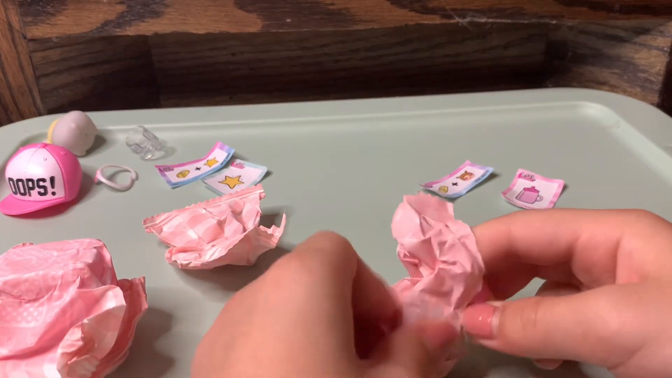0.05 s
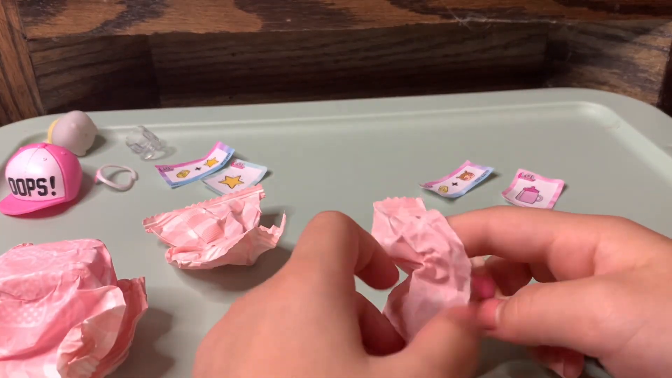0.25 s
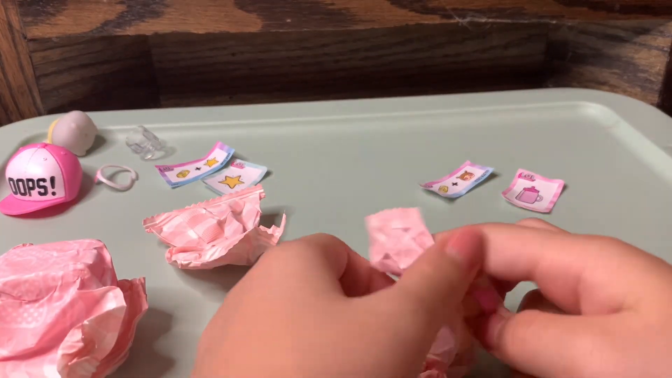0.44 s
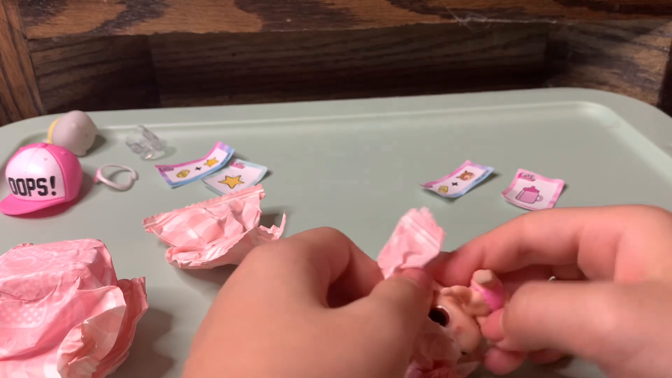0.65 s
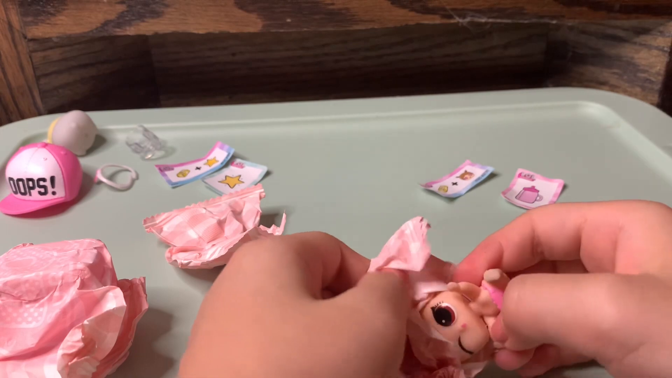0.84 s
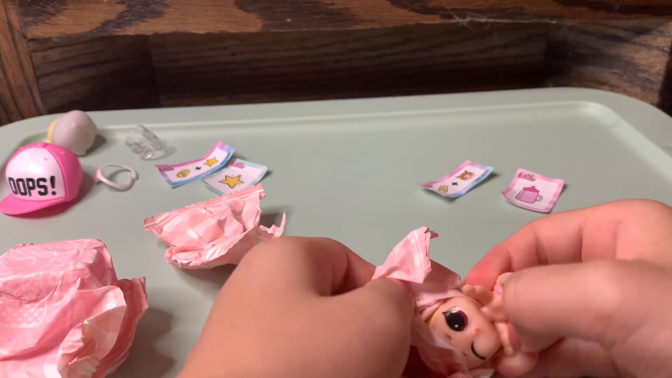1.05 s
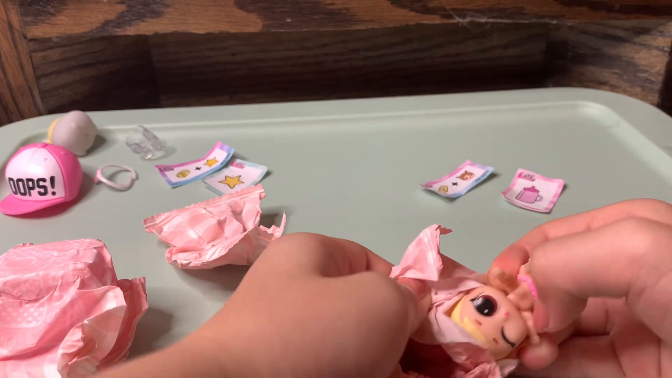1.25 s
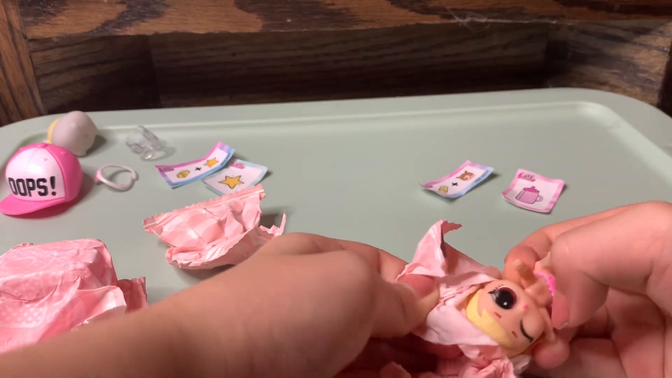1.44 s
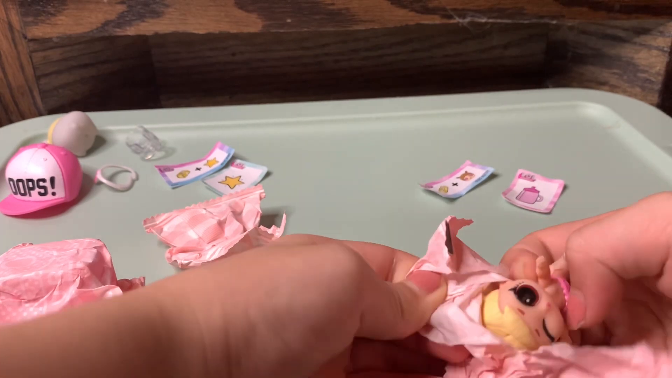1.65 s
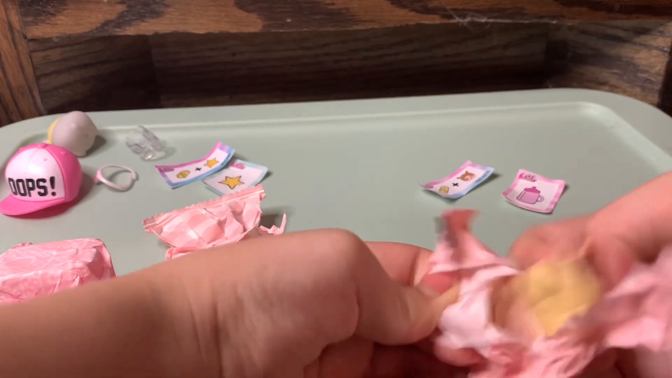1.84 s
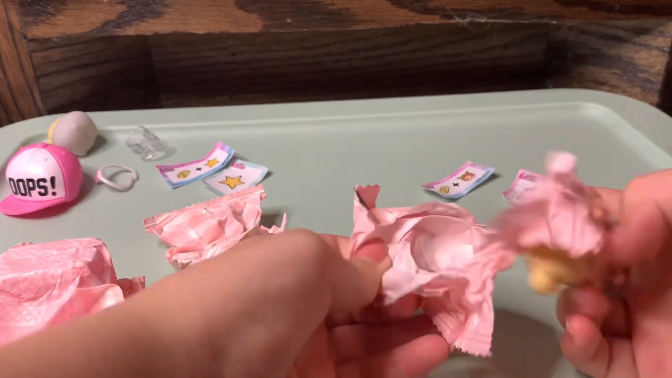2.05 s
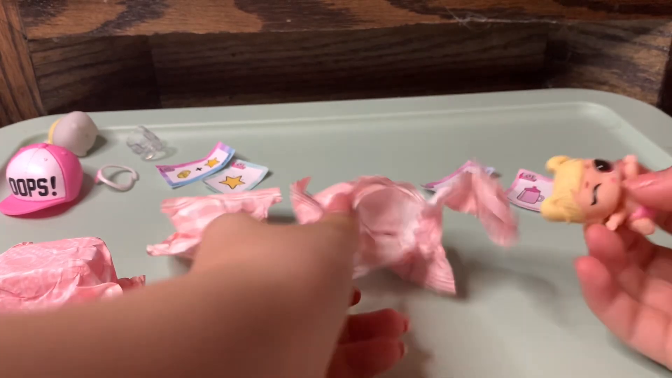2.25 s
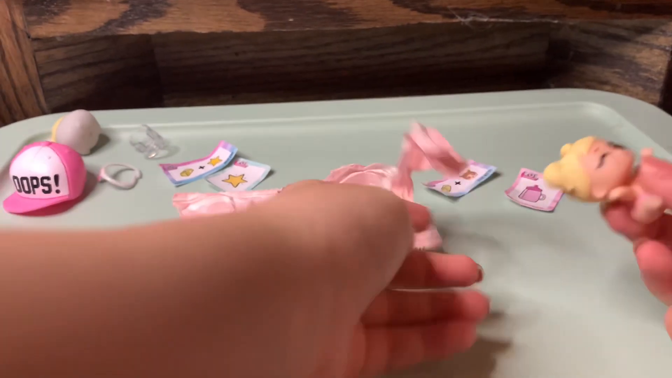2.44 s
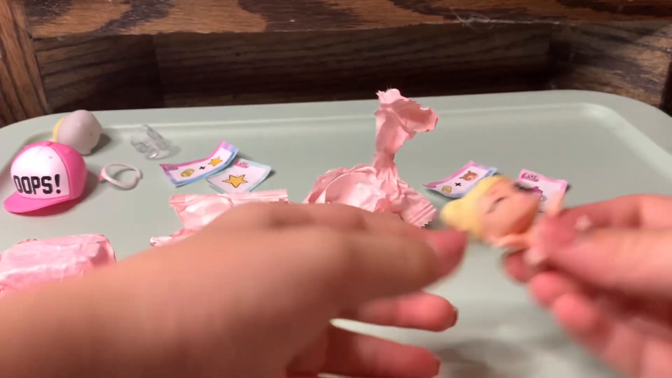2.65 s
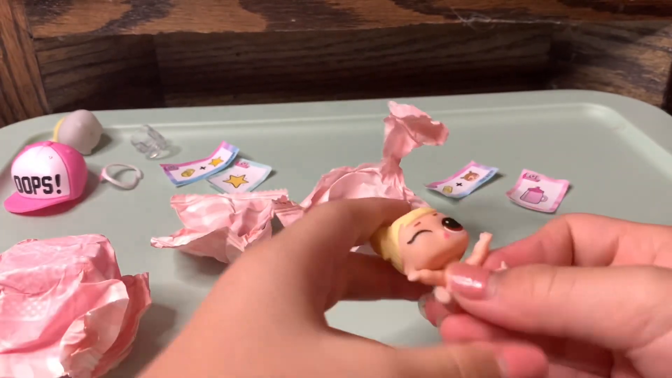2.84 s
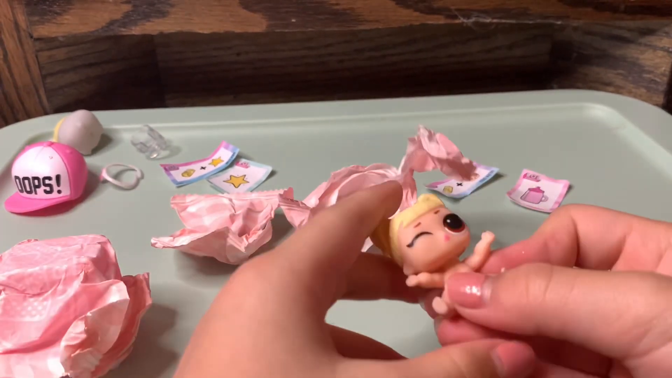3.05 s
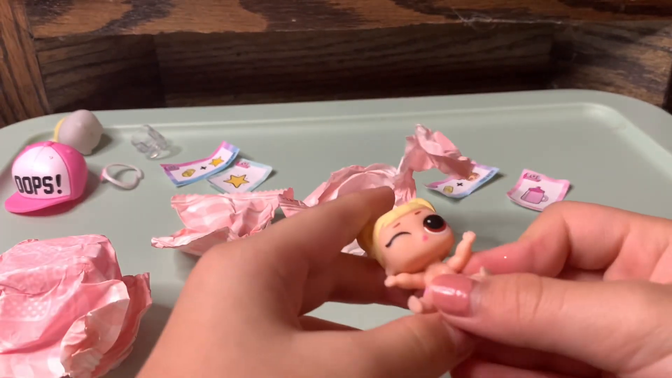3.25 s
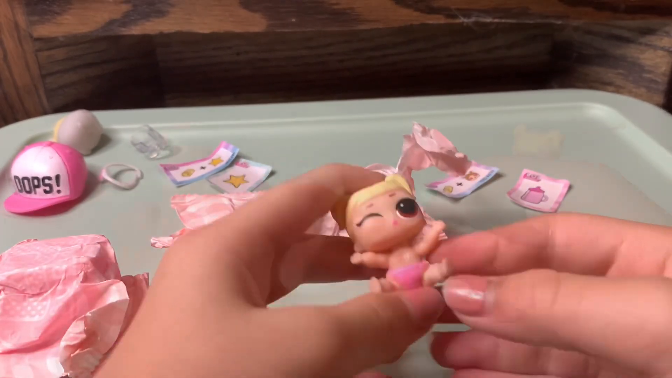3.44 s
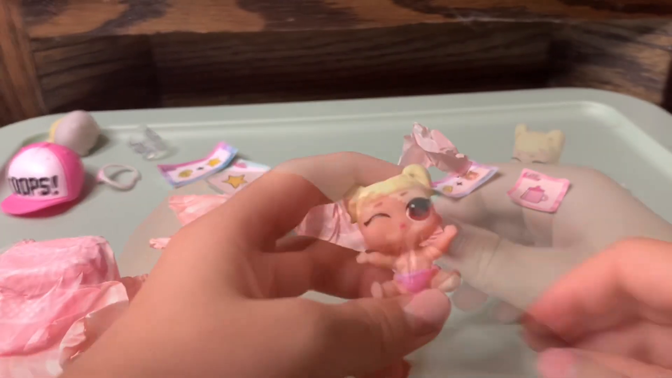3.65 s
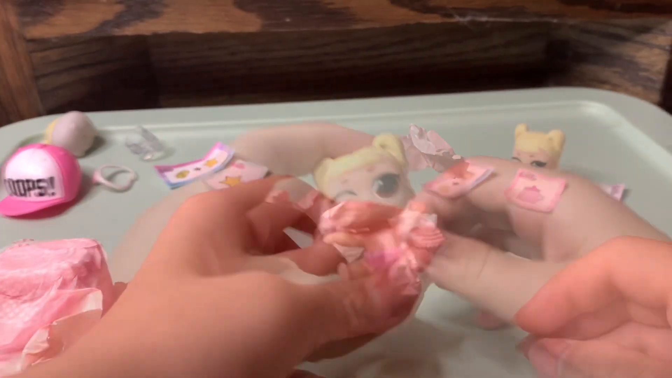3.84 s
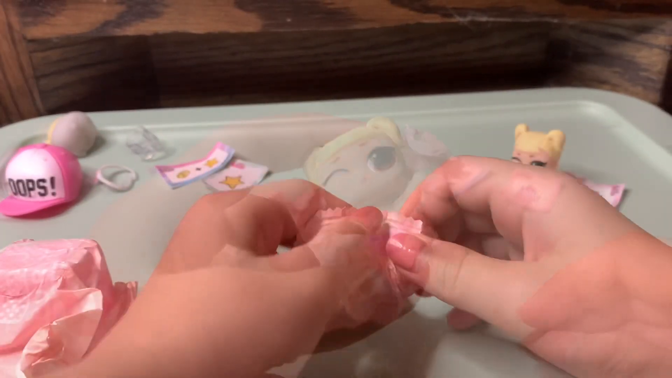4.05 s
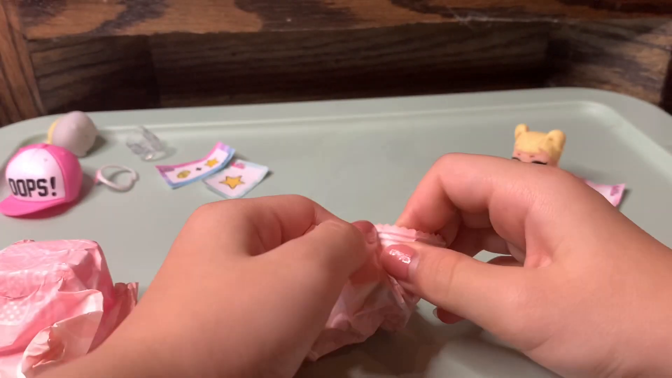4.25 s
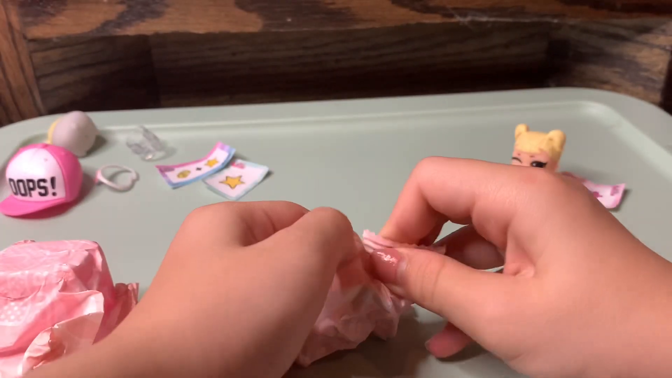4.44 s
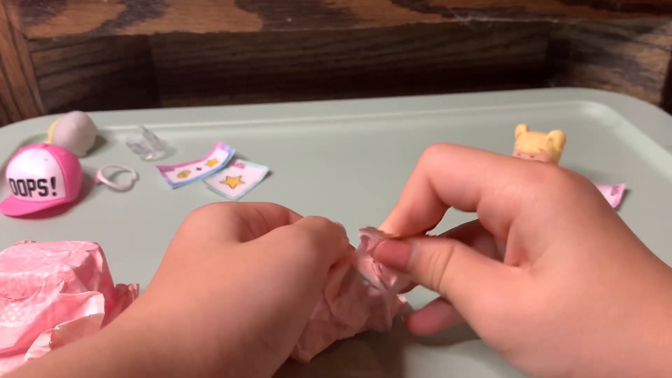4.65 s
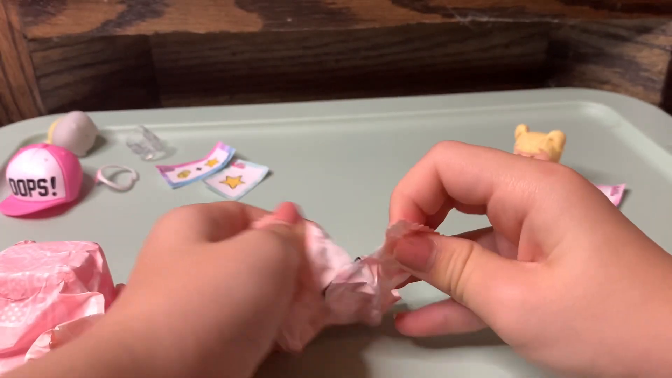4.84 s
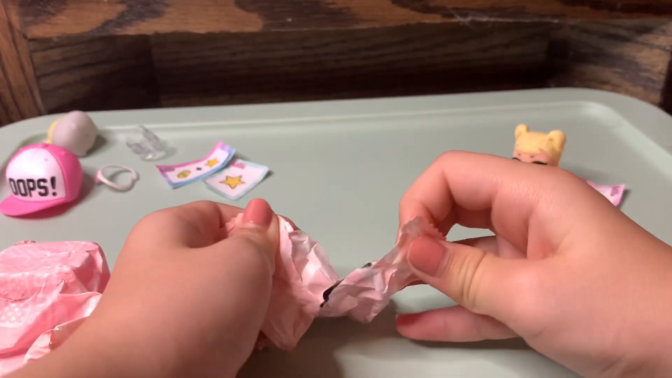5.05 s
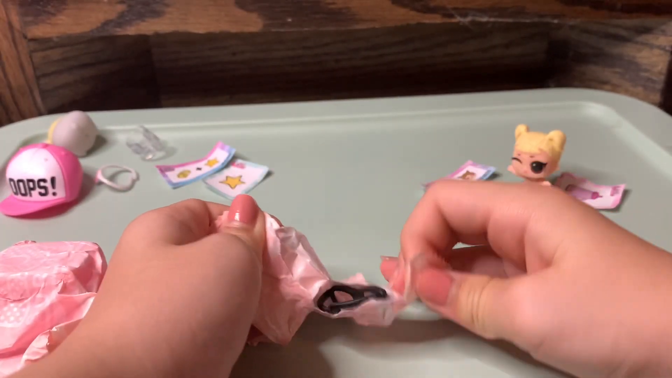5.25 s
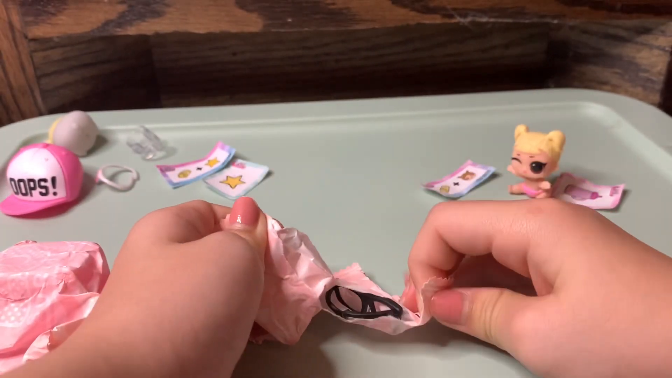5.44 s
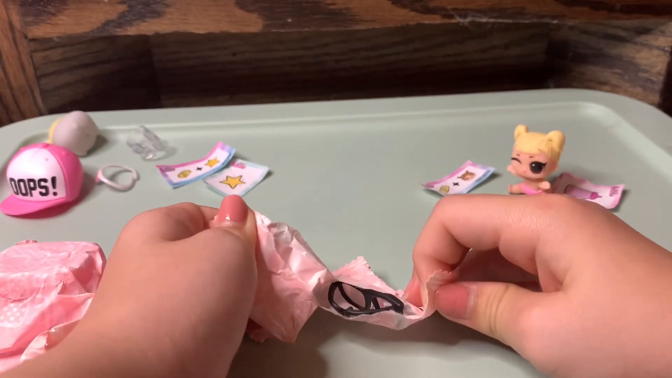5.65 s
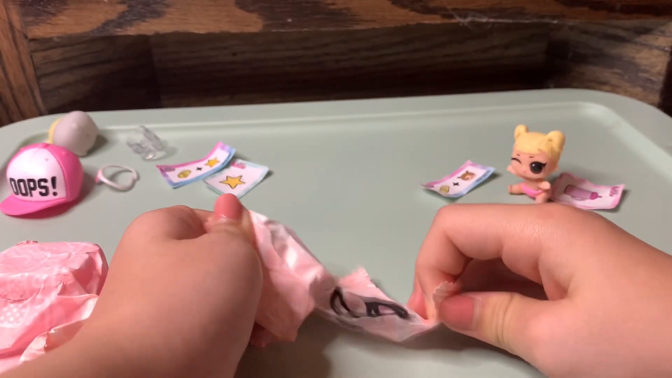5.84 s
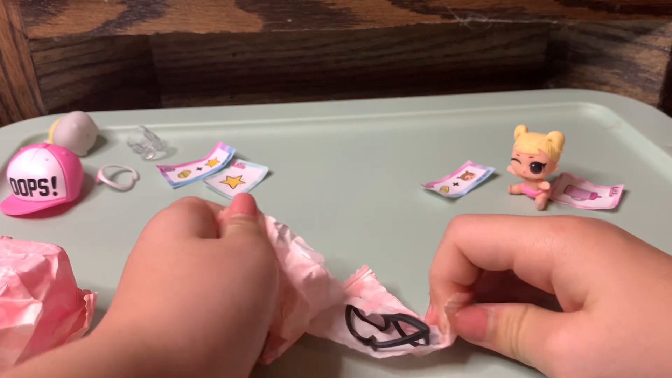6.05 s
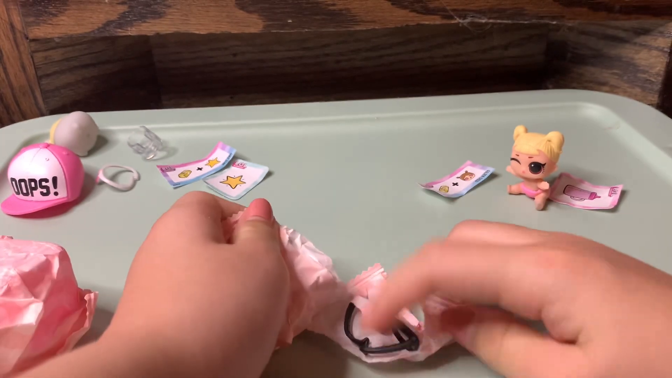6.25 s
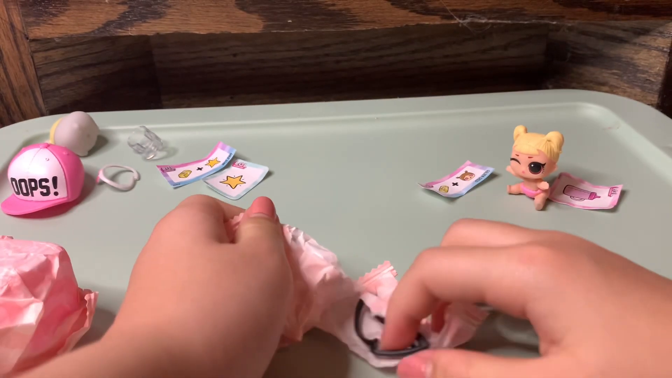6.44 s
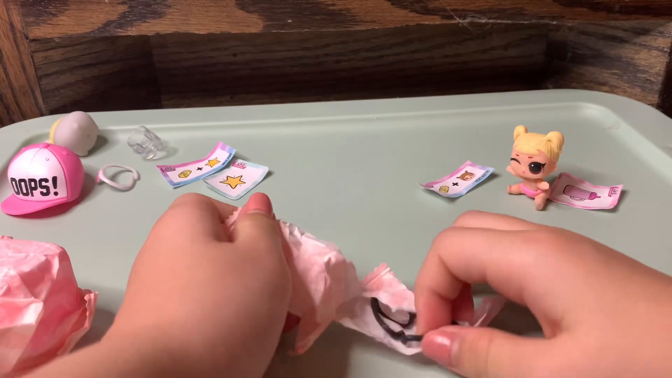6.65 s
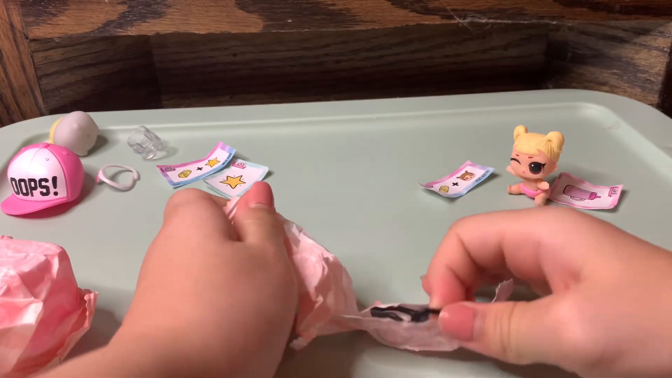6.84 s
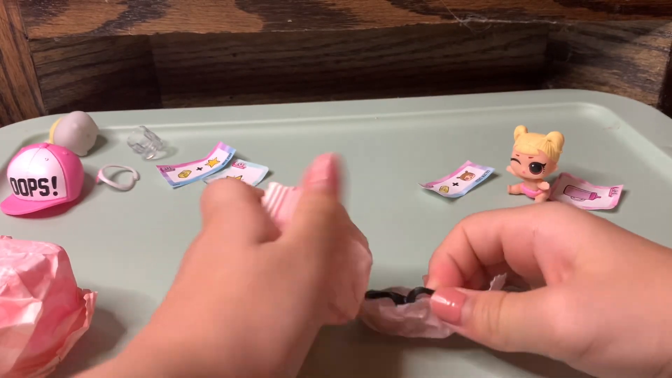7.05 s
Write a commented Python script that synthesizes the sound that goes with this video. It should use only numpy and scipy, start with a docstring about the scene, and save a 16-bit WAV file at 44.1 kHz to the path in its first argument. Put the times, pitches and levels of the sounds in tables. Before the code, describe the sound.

Close to a phone in a quiet room, thin wrapping film crackles and snaps as fingers squeeze it, then tears open. The rustle dies away for about a second before more wrapping is worked, with several short, bright rips. A deep rumble from an arm sliding on the table follows the last rip while the crinkling carries on. Occasional dull knocks on a plastic tray and a low hum lie underneath.

```python
"""Thin wrapping film crackles as hands crumple it and tear it open over a plastic tray, close to a
phone's two microphones in a quiet room. Each crease that buckles is a short snap, coloured by the air
cupped under the hands; squeezes are swells of small snaps and tears are dense runs of them. Fingers
bump, rub and slide, a forearm drags once along the table, and the room hums low behind it all."""
import sys
import numpy as np
from scipy import signal
from scipy.fft import rfft, irfft, next_fast_len
from scipy.io import wavfile
from scipy.ndimage import uniform_filter1d, map_coordinates

SR = 44100
rng = np.random.default_rng(int(sys.argv[2]) if len(sys.argv) > 2 else 0)


def generate_wav(sig):
    """Save sig (samples, or channels by samples) to the path in sys.argv[1] as 16-bit PCM at SR."""
    pcm = np.round(np.clip(np.atleast_2d(sig).T, -1, 1) * 32767).astype(np.int16)
    wavfile.write(sys.argv[1], SR, pcm)


N = 313551

# centres of the four zones of a crease's sound: thud, ring, body, treble (frequency [Hz])
ZONES_HZ = [500, 1500, 3400, 9000]


def amp(db):
    """Gain of a level in dB."""
    return 10 ** (np.asarray(db) / 20)


def along(points, hz):
    """A curve through (Hz, value) points on a log frequency axis."""
    knots, values = np.transpose(points)
    return np.interp(np.log(hz + 1), np.log(knots + 1), values)


def read(rows, t):
    """Each column after the time, at times t."""
    times, *columns = np.transpose(rows)
    return np.array([np.interp(t, times, column) for column in columns])


def wobble(rate, t):
    """A smooth random curve at times t, with rate knots a second."""
    return map_coordinates(rng.standard_normal(int(N * rate / SR) + 4), [t * rate])


def filtered(x, response):
    """x through a complex response, given as a function of frequency."""
    size = next_fast_len(N + 8192)
    return irfft(rfft(x, size) * response(np.fft.rfftfreq(size, 1 / SR)), size)[..., :N]


def ears(pair, alike):
    """Left and right from two unrelated noises, at a given likeness (1 = identical)."""
    turn = np.arccos(np.clip(alike, -1, 1)) / 2
    mid, side = np.cos(turn) * pair[0], np.sin(turn) * pair[1]
    return np.array([mid + side, mid - side])


def rush(spectrum):
    """Steady stereo noise of rms 1, shaped by (Hz, dB) points."""
    # room sound across the two microphones: (frequency [Hz], likeness [0-1])
    likeness = [(200, 0.92), (400, 0.79), (1000, .1), (5500, .2), (7500, 0.75), (15000, 0.96)]
    size = next_fast_len(N)
    hz = np.fft.rfftfreq(size, 1 / SR)
    white = ears(rfft(rng.standard_normal((2, size))), along(likeness, hz))
    noise = irfft(white * amp(along(spectrum, hz)), size)[:, :N]
    return noise / np.sqrt(np.mean(noise ** 2))


def film_colour(times, zones_db, stretch, hz):
    """Spectrum of each crease: the film heard together with its reflection off the tray, a comb of evenly
    spaced peaks."""
    # the open film: (frequency [Hz], level per Hz [dB])
    film = [(100, -8.5), (300, -6.5), (800, -7.5), (1600, -8.5), (2100, 0.5), (3500, 8), (4600, -1.5),
            (6000, -2.5), (7600, 3), (10000, 0), (15000, -6)]
    # peaks of the comb made by the film's reflection off the tray: (frequency [Hz], width [Hz], gain over the
    # open film [ratio])
    modes = [(1620, 220, 3), (3100, 320, 1.2), (4550, 500, 2.2), (6200, 450, 1.1)]
    # lift of each zone, as narrow zones hold more level per Hz: (gain [dB])
    lift_db = [33.5, 30.24, 21.4, 23.39]
    hollow = 1 + sum(gain * 1j * hz * width / ((mode * stretch) ** 2 - hz ** 2 + 1j * hz * width)
                     for mode, width, gain in modes)
    # the second wrapper, from 3.4 s on, is thinner in one band
    wrapper_db = np.outer(times >= 3.4, along([(1670, 0), (2790, -3), (4200, 0)], hz))
    zone_shapes = np.array([along(list(zip(ZONES_HZ, row)), hz) for row in np.eye(len(ZONES_HZ))])
    return hollow * amp(along(film, hz) + wrapper_db + (zones_db.T + lift_db) @ zone_shapes)


def creases(times, zones_db, pan_db, fast_t60, slow_t60, rise_s, ripple_db):
    """Each buckling crease is a noise burst: the treble dies fast, the hollow rings on longer."""
    # the close film across the two microphones: (frequency [Hz], likeness [0-1])
    likeness = [(500, 0.95), (1500, 0.79), (2000, 0.21), (3300, 0.98), (5300, 0.28), (7000, 0.88),
                (15000, 1)]
    size, lead = 512, 64  # samples in a burst, and before its onset
    t = np.maximum(np.arange(size) - lead, 0) / SR
    hz = np.fft.rfftfreq(size, 1 / SR)
    attack = 1 - np.exp(-(t / rise_s) ** 2)
    noise = rng.standard_normal((len(times), 2, size)).transpose(1, 0, 2) * attack
    life, grip = rng.standard_normal((len(times), 2, 1)).transpose(1, 0, 2)
    fast, slow = (rfft(noise * amp(-60 * t / (t60 * amp(2 * life)))) for t60 in (fast_t60, slow_t60))
    slow_share = .13 + .75 / (1 + (hz / 2200) ** 2)
    pair = fast * (1 - slow_share) + slow * slow_share * np.sqrt(fast_t60 / slow_t60)
    stretch = amp(.25 * grip)  # the hands change the hollow a little
    colour = film_colour(times, zones_db, stretch, hz)
    # every facet of film has resonances of its own, which colour a snap but keep its strength
    facet = 3.4 * uniform_filter1d(rng.standard_normal((len(times), len(hz))), size=6, axis=1)
    spectra = ears(pair, along(likeness, hz)) * colour * amp(ripple_db * facet)
    energy = lambda z: np.sum(abs(z) ** 2, axis=-1, keepdims=True)
    spectra *= np.sqrt(energy(colour) / energy(spectra).mean(axis=0))
    bursts = irfft(spectra, size) * amp(np.outer([.5, -.5], pan_db))[..., None]
    at = (np.round(times * SR).astype(int)[:, None] + np.arange(size)).ravel()
    return np.array([np.bincount(at, side.ravel(), N + size)[lead:N + lead] for side in bursts])


def snaps():
    """Single creases buckle and stand out of the crackle, close in front of the microphones."""
    # creases, ahead of each zone's trim: (time [s], level [dB], body offset [dB], ring offset [dB])
    buckles = [(0.0299, -38.5, -4.5, 15), (0.0521, -11.5, -17, -37), (0.0702, -19.5, -17.5, -29),
               (0.1, -22, -5, -27), (0.119, -22.5, -4.5, -12), (0.1384, -20.5, -18.5, -18.5),
               (0.186, -16.5, -21.5, -13), (0.2117, -38, -19, 11.5), (0.2861, -19.5, -22, -20),
               (0.323, -38.5, -19, 9.5), (0.3316, -29, -8, -38), (0.3964, -30.5, -15, -6),
               (0.4255, -17.5, -13.5, -21), (0.434, -22.5, -19, -3), (0.4514, -31.5, 1, -27),
               (0.4666, -29, -11, -29), (0.602, -25.5, -29, -42), (0.632, -25, -17, -13),
               (0.675, -40.5, 5, 7), (0.7301, -32.5, 6, 9), (0.768, -33.5, -7, 0.5), (0.8142, -34, 2, -27),
               (0.8266, -31.5, -4, 7.5), (0.9672, -28, -17, -17), (0.998, -34.5, -6, -12),
               (1.029, -36, -4, -19), (1.0437, -26, -10, 3.5), (1.087, -30, -13, -4),
               (1.1057, -22, -14, -7), (1.1397, -36, -9, -3), (1.1546, -25, -6, -8), (1.1747, -45, 2, -7),
               (1.186, -41, 4, 0), (1.222, -40, 5, -3), (1.237, -31.5, 1, -9), (1.255, -26, -4.5, -15),
               (1.272, -25.5, -10, -6.5), (1.282, -39, -1, -27), (1.3426, -26.5, -8, -3.5),
               (1.3704, -12.5, -11.5, -16), (1.391, -26, -12, -10), (1.4059, -12.5, -11.5, -22),
               (1.4445, -37, -4, -15), (1.456, -28, -4, -24), (1.4675, -27, -6, -18),
               (1.4957, -16, -10, -18), (1.513, -25.5, -7, -10), (1.5215, -23, -4, -22),
               (1.541, -15, -14, -27), (1.5474, -21, -9, -21), (1.562, -20.5, -5, -23),
               (1.5759, -39, 16, 3), (1.5933, -19, -4.5, -13), (1.6145, -21.5, -10, -19),
               (1.6364, -17, -8, -27), (1.6452, -19.5, -1.5, -13), (1.6555, -34.5, 13, -4),
               (1.6683, -31, -1, -16), (1.6776, -16, -14, -21), (1.6884, -25, -3, -24),
               (1.6973, -30, 2, -19), (1.709, -18, -6.5, -12), (1.7192, -33, 3.5, -2),
               (1.73, -29, -11.5, -21), (1.7396, -25.5, -0.5, -7.5), (1.758, -19, -24, -17.5),
               (1.772, -25, -18, -16), (1.796, -22, -11, -6.5), (1.81, -27, -23, -20),
               (1.8238, -8, -34, -27), (1.849, -9.5, -11, -12), (1.864, -17, -8, -14),
               (1.8748, -17.5, -12, -15), (1.887, -12.5, -22, -11.5), (1.8956, -22.5, -14, -10),
               (2.0487, -32, -14, -8), (2.0778, -30, -14, -15), (2.0935, -35, -26, -32),
               (2.159, -37.5, -3, -4), (2.2455, -28.5, -22, -33), (2.378, -50, -33, 6),
               (2.5344, -51, 0, -5), (2.5845, -57.5, 2.5, -6), (2.959, -61.5, -6, 6),
               (3.4507, -42, -10.5, -1), (3.5966, -33.5, -22, -27), (3.6589, -28.5, -5.5, -5.5),
               (3.847, -43.5, -4, 12), (3.8654, -41.5, -14, 9), (3.88, -32.5, -8, -7), (3.898, -41, -3, 7),
               (3.906, -41, 2, 3), (4.0943, -40.5, -5, 5), (4.118, -35.5, -19, -2),
               (4.326, -30.5, -6.5, -4.5), (4.35, -23, -28, -15), (4.3756, -21, -25, -25),
               (4.3804, -22, -25, -30), (4.4015, -15.5, -29, -13.5), (4.411, -25, -11, -16),
               (4.424, -31, -6, -12), (4.4548, -22.5, -19, -11), (4.493, -19, -6.5, -27),
               (4.5141, -10, -12, -10), (4.5434, -29, -17, -19), (4.557, -24, -21, -23),
               (4.587, -23, -27, -24), (4.6133, -13, -34, -37), (4.63, -21, -24, -35),
               (4.6368, -17, -28, -40), (4.684, -30, -26, -28), (4.813, -9, -11, -15),
               (4.8495, -11, -10, -6), (4.8704, -9, -26, -15.5), (4.918, -23, -26, -20),
               (4.929, -26, -29, -17), (4.936, -18, -29, -15), (4.955, -6, -31, -14),
               (4.965, -13, -24, -8.5), (4.984, -9.5, -24, -19), (5.1032, -12, -27, -15),
               (5.1142, -25, -32, -12), (5.129, -7, -24, -22.5), (5.1762, -24, -22, -18),
               (5.194, -33.5, -16, 4), (5.2647, -10, -21, -12.5), (5.28, -24.5, -26, -9),
               (5.2882, -15.5, -37, -9), (5.3224, -33, -32, -21), (5.332, -30.5, -35, 0),
               (5.369, -21, -13.5, -10.5), (5.3931, -22, -8, -15), (5.4, -21.5, -10, -11),
               (5.411, -39, -14, 5), (5.4836, -21.5, -16, -10), (5.5053, -20, -15, -25),
               (5.5237, -33, -14, -22), (5.554, -26.5, -15, -25), (5.5618, -31, -17, -14),
               (5.5905, -14, -12, -10), (5.607, -25, -10, -9), (5.633, -22.5, -4.5, -15),
               (5.658, -27, -8, -8), (5.693, -29.5, -21, -15), (5.7185, -23, -10, -9.5),
               (5.7382, -28, -2, -18), (5.747, -31.5, -10, -8), (5.77, -38, -10, -27), (5.79, -31, -6, -16),
               (5.7984, -22.5, -11, -12), (5.8174, -26.5, -11, -8), (5.833, -31, -13, -20),
               (5.844, -27, -4, -8), (5.8565, -7, -19, -14.5), (5.8692, -9, -7.5, -17),
               (6.008, -38, -1, -9), (6.03, -20, -13, -22), (6.0962, -28, -25, -14),
               (6.2809, -24, -4.5, -13), (6.592, -23, -8, -15), (6.7715, -30, -7, -29.5),
               (6.815, -35, 5, -22), (6.8208, -17.5, -21, -20.5), (6.834, -25, -15, -18),
               (6.8512, -18, -19.5, -23), (6.89, -16, -7, -14), (6.896, -26, -6, -14),
               (6.919, -21.5, -20, -24), (6.962, -17, -22, -21.5), (6.9932, -12, -27, -26.5),
               (7.02, -12, -8, -12), (7.0927, -30, -16, -5)]
    times, level_db, body_db, ring_db = np.transpose(buckles)
    zones_db = level_db + np.array([ring_db - 15.5, ring_db - 3, body_db + 2, np.full(len(times), -6)])
    pan_db = -.6 + .37 * rng.standard_normal(len(times))
    rise_s = .001
    return creases(times - rise_s / 2, zones_db, pan_db,
                   fast_t60=.005, slow_t60=.017, rise_s=rise_s, ripple_db=2.2)


def squeezes(t):
    """Fingers squeeze the film and the crackle swells and sinks: level and brightness of each, in dB."""
    # squeezes: (peak time [s], length [s], level [dB], treble over body [dB])
    presses = [(0.119, .26, -38.5, 1.5), (.359, .1, -48, 4), (0.443, .08, -44, 2), (0.523, .1, -46, 2),
               (0.588, .14, -43, 2.5), (0.258, .08, -51.5, -3), (0.683, 0.065, -48, -0.5),
               (0.726, .07, -47, 0), (0.838, .09, -39, -5), (0.976, .1, -50, 0.5), (1.077, .12, -42.5, 1),
               (1.186, .16, -44.5, 0), (1.288, .1, -49, -1.5), (1.355, .06, -50, 3), (1.45, .12, -41, -3.5),
               (1.548, .13, -36, -6), (1.67, .14, -35.5, 1.5), (1.769, .1, -38.5, 0.5),
               (1.933, .1, -53, -0.5), (2.089, .14, -50.5, 4), (2.175, .1, -47.5, -4.5),
               (2.265, .16, -51.5, 5), (2.392, .1, -59, 2), (2.541, .12, -62, -10), (3.519, .2, -66, 7),
               (3.718, .16, -60, -2), (3.881, .25, -49.5, 2.5), (3.949, .09, -43.5, 0),
               (4.097, .12, -52, -0.5), (4.184, .08, -47, -0.5), (4.237, 0.054, -48, 0),
               (4.284, .05, -50.5, -0.5), (4.422, .16, -47, 5.5), (4.558, .1, -44, 9),
               (4.642, .2, -40.5, 12.5), (4.791, .05, -45.5, 3), (4.93, 0.055, -44, 2), (5.048, .1, -58, 2),
               (5.172, .08, -42, 6), (5.273, .15, -34.5, 5), (5.397, .08, -41, 8), (5.497, .1, -47.5, 0),
               (5.598, .05, -36, 4), (5.669, .08, -52.5, 0), (5.761, .1, -47, 0), (5.839, .06, -42, -0.5),
               (5.981, .1, -46, 0), (6.118, .18, -44, 2), (6.251, .06, -50.5, -6.5), (6.3, .1, -42, 0),
               (6.459, .18, -41.5, -1), (6.603, .1, -46, 1), (6.711, .14, -39, 0.5),
               (6.817, .06, -43, -4.5), (6.895, .08, -48, 6), (7.043, .2, -43, -2.5)]
    peak, length, level_db, bright_db = np.transpose(presses)[..., None]
    swell_share, sink_db = .4, 12
    from_peak = abs(t - peak) / (length * np.where(t < peak, swell_share, 1 - swell_share))
    return level_db - sink_db * from_peak ** 1.5, bright_db


def tears(t):
    """The film rips abruptly and weakens as the tear runs: level and brightness of each, in dB."""
    # rips: (start [s], length [s], level [dB], treble over body [dB])
    rips = [(1.812, .02, -31, 9), (1.836, .017, -27.5, 8), (1.873, .027, -29.5, 9), (4.811, .077, -26, 4),
            (4.949, .046, -30, 4.5), (5.109, .041, -35, 9), (5.867, .058, -23, 2)]
    start, length, level_db, bright_db = np.transpose(rips)[..., None]
    rise, sag, fall = 2200, 50.5, 1600  # dB/s
    before, since, after = np.maximum([start - t, t - start, t - start - length], 0)
    return level_db - rise * before - sag * since - fall * after, bright_db


def handling(t):
    """Treble and body level in dB of all squeezes and tears together."""
    body_db, bright_db = (np.concatenate(both) for both in zip(squeezes(t), tears(t)))
    total = lambda db: 10 * np.log10(np.sum(amp(2 * db), axis=0) + 1e-12)
    return total(body_db + bright_db), total(body_db)


def hollow_ring(body_db, t):
    """Level in dB of the air ringing under the hands; it grows more slowly than the crackle's body."""
    # strength of the cupped air's ring: (time [s], gain [dB])
    cupped = [(0, 5), (.6, 2), (1.2, 8), (1.6, -5.5), (2.3, 3), (2.9, 0.5), (3.9, 9), (4.5, 2), (5.3, -3),
              (5.7, -3), (6.4, -0.5), (7.11, -4.5)]
    pivot_db = -47.5
    return pivot_db + .79 * (body_db - pivot_db) + read(cupped, t)[0]


def crumple(count=5000, hop=64):
    """Many small creases of uneven size and colour; harder handling makes them louder and denser."""
    t = np.arange(0, N, hop) / SR
    strongest_db = np.max(handling(t), axis=0)
    busy = (strongest_db > -80) * amp(.22 * strongest_db)
    rate = count * busy / busy.sum() * SR / hop  # creases a second
    jitter, size_draw = rng.random((count, 2)).T
    times = np.interp(np.arange(count) + jitter, np.cumsum(rate) * hop / SR, t)
    treble_db, body_db = handling(times)
    ring_db = hollow_ring(body_db, times)
    clumps_db = 3 * wobble(150, times)
    spiky = np.clip(2.2 + .035 * (treble_db + 30), .6, 4.5)  # gentle handling rubs, hard crackles
    uneven_db = clumps_db - spiky * np.log(1 - .985 * size_draw) - 4
    # the more creases, the less each carries
    share_db = 10 * np.log10(380 / np.interp(times, t, np.maximum(rate, 200))) + .11
    # the treble crackles in spikes and gaps, the lower zones rustle on more evenly
    size_db = share_db + np.outer([.7, .7, .8, 1.4], uneven_db)
    tint_db = 3 * rng.standard_normal((count, len(ZONES_HZ))).T
    zones_db = size_db + tint_db + np.array([ring_db - 11, ring_db - 5, body_db, treble_db])
    pan_db = -.6 + 1.4 * rng.standard_normal(count)
    return creases(times, zones_db, pan_db, fast_t60=.0032, slow_t60=.012, rise_s=.00053, ripple_db=4)


def bumps():
    """Fingers bump the tray: each time a short low ring with a dull puff."""
    # soft knocks: (time [s], relative level [dB], pitch [Hz])
    knocks = [(0.073, -40, 147), (0.183, -37, 140), (0.38, -43, 106.5), (1.494, -44, 128.6),
              (1.847, -35, 187), (1.891, -34.5, 128), (2.245, -41, 173), (3.452, -52, 530),
              (3.659, -45.5, 170), (4.424, -39.5, 111), (4.815, -37, 410), (4.954, -41, 306),
              (5.87, -29.5, 258), (6.296, -36.5, 342), (6.589, -42.5, 334)]
    puff_t60, ring_t60, rise_s = .09, .06, .004
    out, t = np.zeros(N + SR), np.arange(SR // 10) / SR
    soften = signal.butter(2, 700, fs=SR)
    for start, db, hz in knocks:
        puff = 3 * signal.lfilter(*soften, rng.standard_normal(len(t))) * amp(-60 * t / puff_t60)
        ring = .8 * np.sin(2 * np.pi * hz * t) * amp(-60 * t / ring_t60)
        out[round(start * SR):][:len(t)] += amp(db + 6.5) * (ring + puff) * (1 - np.exp(-t / rise_s))
    return out[:N]


def drag(start_s=5.95, end_s=6.45, level_db=-44, centre_hz=50):
    """A forearm drags along the table and sends a deep, lumpy rumble through it."""
    t = np.arange(N) / SR
    moving = np.clip(np.minimum(t - start_s, end_s - t) / .035, 0, 1)
    lumps_db = 1.5 * wobble(18, t)
    return moving * amp(level_db + lumps_db) * rush([(8, -50), (centre_hz, 0), (300, -45), (3000, -120)])


def hiss_bands():
    """Bands of hiss that swell and fade: soft rubbing, and the bright top sizzle of the last tear."""
    # swells of hiss: (start [s], length [s], centre [Hz], width [Hz], level [dB])
    swells = [(2.52, .2, 1240, 60, -71), (2.85, .24, 3450, 3400, -76), (3.05, .2, 4600, 1600, -74),
              (3.16, .4, 2440, 300, -75), (3.934, .046, 1040, 310, -45), (3.931, .046, 1530, 370, -38),
              (4.57, .12, 13900, 2900, -39), (5.866, .06, 13600, 3600, -32)]
    out = np.zeros((2, N))
    for start, length, hz, width, db in swells:
        inside = np.arange(round(start * SR), round((start + length) * SR))
        t = inside / SR
        band = signal.butter(2, [hz - width / 2, hz + width / 2], "band", fs=SR, output="sos")
        noise = ears(rng.standard_normal((2, N // 8)), alike=.3)
        hiss = signal.sosfilt(band, noise)[:, :len(t)] * np.sqrt(SR / 2 / width)
        swell = np.sqrt(abs(np.sin(np.pi * (t - start) / length)))
        out[:, inside] += hiss * amp(db + 1.5 * wobble(29.4, t)) * swell
    return out


def room(source):
    """The room answers with a short tail whose treble dies first."""
    # reverberation: (frequency [Hz], time to fall 60 dB [s])
    decay = [(300, 0.24), (10000, 0.013)]
    hz, t, noise = signal.stft(rng.standard_normal((2, SR // 3)), SR, nperseg=256)
    tail = signal.istft(noise * amp(-60 * t / along(decay, hz)[:, None]), SR, nperseg=256)[1]
    delayed = np.pad(source, (200, 0))
    return signal.fftconvolve(delayed[None], tail / np.linalg.norm(tail[0]), axes=1)[:, :N]


def background():
    """Room tone, a low hum under faint wavering hiss, with hands sliding softly on the tray."""
    # course of hum and sliding: (time [s], relative hum level [dB], slide level [dB])
    levels = [(0, -59.5, -61), (2.2, -61, -63), (3.46, -63, -73), (3.9, -61, -61.5), (7.11, -60, -57.5)]
    # the room's hum: (frequency [Hz], level per Hz [dB])
    hum_shape = [(12, -55), (20, -20), (81, 1.5), (140, -6.5), (162, -8.5), (200, -19), (260, -40),
                 (440, -120)]
    # the tray under sliding hands: (frequency [Hz], level per Hz [dB])
    tray_shape = [(120, -23), (220, -2.5), (340, -3), (500, -10), (900, -17.5)]
    # the room's hiss: (frequency [Hz], level per Hz [dB])
    hiss_shape = [(94, -27), (160, -0.5), (300, -2), (720, -13.5), (1800, -19.5), (2500, -23), (6000, -22),
                  (10000, -26.5), (16000, -38)]
    t = np.arange(N) / SR
    hum_db, slide_db = read(levels, t)
    hum = amp(hum_db + 6 + 1.2 * wobble(7.8, t)) * rush([(8, -71.5)] + hum_shape + [(400, -84.5)])
    slide = amp(slide_db + 2.5 * wobble(15, t)) * rush([(30, -95)] + tray_shape + [(3000, -103)])
    hiss = amp(-65.5 + 1.1 * wobble(24, t)) * rush(hiss_shape)
    return hum + slide + hiss


def scene():
    """The film up close with a little of the room, then bumps, forearm, swells of hiss and room tone."""
    film = snaps() + crumple()
    return film + amp(-19) * room(film[0]) + bumps() + drag() + hiss_bands() + background()


def record(dry):
    """The phone's two microphone ports differ in phase; peaks are rounded and the top treble is cut."""
    # phase between the ports: (frequency [Hz], lead of the left [rad])
    port_phase = [(0, 0), (1460, 0.5), (2070, 2.5), (3700, 4), (5500, 5)]
    split_hz, lag_s = 19000, .0002152  # above the split the left side arrives late
    ceiling, shelf_hz, top_hz = .93, 15800, 16640
    late = lambda hz: -2 * np.pi * hz * lag_s
    knots, lead = np.transpose(port_phase + [(split_hz, late(split_hz) + 4 * np.pi)])
    shift = lambda hz: np.where(hz < split_hz, np.interp(hz, knots, lead), late(hz))
    ports = filtered(dry, lambda hz: np.exp(.5j * np.outer([1, -1], shift(hz))))
    rounded = ports / (1 + abs(ports / ceiling) ** 4) ** (1 / 4)
    shelf = lambda hz: amp(-22 / (1 + np.exp((shelf_hz - hz) / 60)))
    return filtered(rounded, lambda hz: shelf(hz) * np.clip((top_hz - hz) / 80, 0, 1))


dry = scene()
out = record(dry)
generate_wav(out)
```